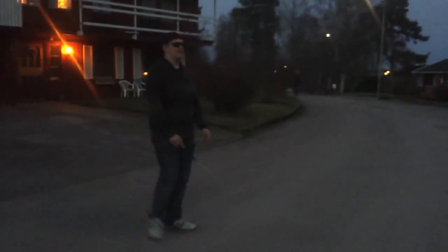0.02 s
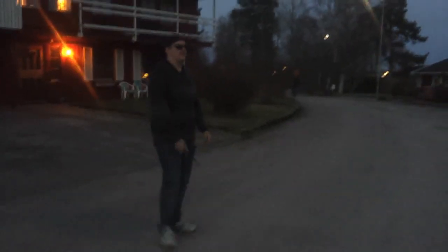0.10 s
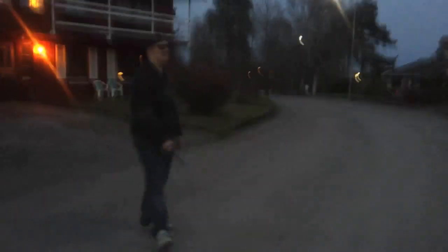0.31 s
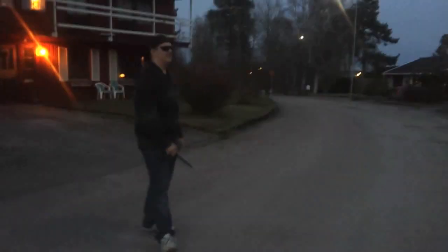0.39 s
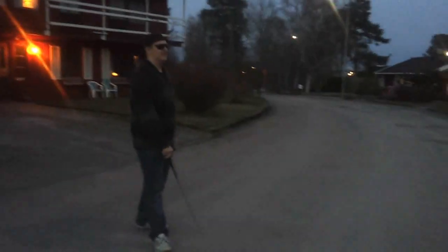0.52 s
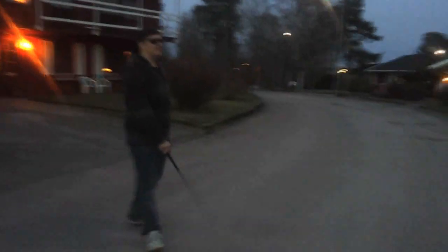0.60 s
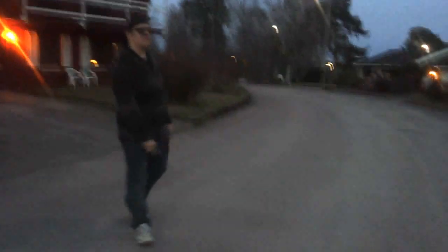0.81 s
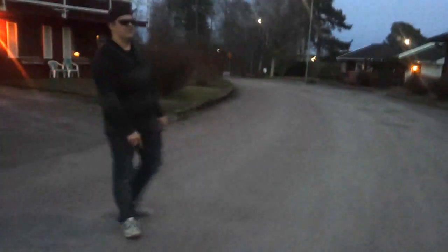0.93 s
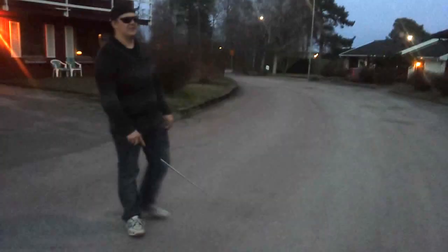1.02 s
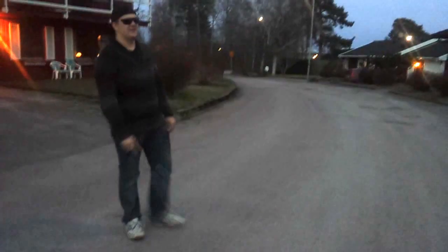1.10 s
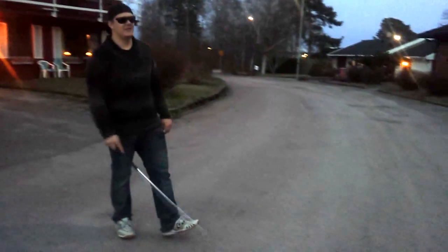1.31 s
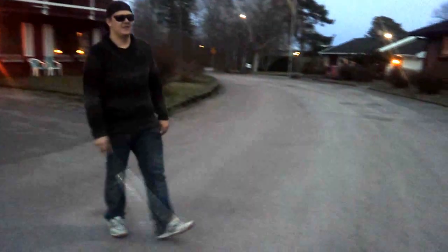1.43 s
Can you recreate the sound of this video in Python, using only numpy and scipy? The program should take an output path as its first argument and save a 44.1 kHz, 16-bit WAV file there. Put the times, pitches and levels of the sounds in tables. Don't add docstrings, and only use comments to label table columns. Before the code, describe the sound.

Four crisp cane taps on rough pavement, each scraping briefly and scattering tiny stones outdoors

```python
import sys
import numpy as np
from scipy import signal
from scipy.fft import rfft, irfft, next_fast_len
from scipy.io import wavfile
from scipy.ndimage import uniform_filter1d, map_coordinates

SR = 44100
rng = np.random.default_rng(int(sys.argv[2]) if len(sys.argv) > 2 else 0)


def how_loud(loudness_db):
    steps = np.asarray(loudness_db, float) / 20
    return 10 ** steps


def file_out(sig):
    cols = np.atleast_2d(sig).T
    lim = np.clip(cols, -1, 1)
    pcm = np.round(lim * 32767).astype(np.int16)
    wavfile.write(sys.argv[1], SR, pcm)


N = 66150

# t/s, length/s, level/dB, t60/s
SKIDS = [
    (.2340, .005, -13.5, .04),
    (.5600, .0035, -17, .032),
    (.8843, .009, -13, .03),
    (1.2109, .0035, -13, .026),
]


def unit(x):
    return x / np.sqrt(np.mean(x ** 2) + 1e-20)


def filtered(x, points):
    m = next_fast_len(x.shape[-1] + 8192)
    f, db = np.transpose(points)
    log_f = np.log(np.fft.rfftfreq(m, 1 / SR) + 1)
    gain = how_loud(np.interp(log_f, np.log(f + 1), db))
    return irfft(rfft(x, m) * gain, m)[..., :x.shape[-1]]


def grains(s, gain, hz, cycles, phase, size):
    t = (np.arange(size) - size // 2) / SR
    life = (cycles / hz)[:, None] * np.where(t > 0, 1.2, .85)
    bell = np.exp(-.5 * (4 * t / life) ** 2)
    wavelets = gain[:, None] * bell * np.sin(2 * np.pi * (hz[:, None] * t + phase[:, None]))
    at = np.round(s * SR).astype(int)[:, None] + np.arange(size) - size // 2
    return np.bincount(np.clip(at, 0, N).ravel(), wavelets.ravel(), N + 1)[:N]


def patchy(colour, patchy_db):
    z = signal.stft(rng.standard_normal(N), nperseg=512)[2]
    field = uniform_filter1d(rng.standard_normal(z.shape), 5, 0)
    field = uniform_filter1d(field, 10, 1)
    noise = signal.istft(z * how_loud(patchy_db * unit(field)), nperseg=512)[1][:N]
    return unit(filtered(noise, colour))


def street():
    # f/Hz, level/dB per Hz
    rumble = [(15, -54), (25, -12.5), (199, -8), (452, -13.5), (605, -12), (730, -17.5), (810, -14),
              (1500, -28), (1950, -59), (3300, -120)]
    # f/Hz, level/dB per Hz
    air = [(710, -67), (1200, -2), (2970, -1.5), (3700, -3), (4600, -1), (6220, -0.5), (11500, -12.5),
           (15000, -43), (22000, -120)]
    air_colour = air[:-2] + [(16000, air[-3][1] - 3)]
    return how_loud(-54) * patchy(rumble, 0.17) + how_loud(-53.5) * patchy(air_colour, 0.92)


def zero_line_kicks():
    # t/s, spike level/dB, step level/dB
    kicks = [
        (-.09, -38, -37.5),
        (0.238, -39, -44),
        (0.563, -37, -41.5),
        (0.885, -38, -38.5),
        (1.207, -37, -44),
    ]
    # f/Hz, level/dB per Hz
    hunt_colour = [(10, 10.5), (25, -26), (60, 0.5), (110, -43)]
    spike_s, hold_s, edge_s, recover_s = .006, .046, .008, .085
    hunt_db, hunt_t60 = -42.5, 0.69
    t, out = np.arange(N) / SR, np.zeros(N)
    hunt = unit(filtered(rng.standard_normal(N), hunt_colour))

    def drift(u):
        return np.clip(u / edge_s, 0, 1) * np.exp(-np.clip(u, 0, None) / recover_s)

    for s, spike_db, step_db in kicks:
        u = np.clip(t - s, 0, None)
        out += how_loud(spike_db) * np.e * u / spike_s * np.exp(-u / spike_s)
        out += how_loud(step_db) * (drift(u) - drift(u - hold_s + edge_s / 2))
        out += how_loud(hunt_db - 60 * u / hunt_t60) * np.clip(u / hold_s, 0, 1) * hunt
    return out


def grit():
    # t/s, level/dB, f/Hz
    sprays = [
        [(0.0, -50.5, 5800), (0.062, -46.5, 5480), (0.08, -67, 5300), (0.132, -51.5, 5800), (0.144, -77, 5100),
         (0.152, -48.5, 4700), (0.162, -69, 4590), (0.2, -70, 4610)],
        [(0.254, -56, 6300), (0.266, -46, 7200), (0.283, -46.5, 7250), (0.292, -47, 7300), (0.314, -43.5, 6240),
         (0.36, -52.5, 5660), (0.408, -48, 5400), (0.428, -65, 5130), (0.5, -59, 5230)],
        [(0.574, -43, 5600), (0.578, -40.5, 6130), (0.606, -46.5, 6360), (0.72, -55.5, 4900), (0.73, -51, 4830),
         (0.776, -85, 5800), (0.8, -54, 5640)],
        [(0.904, -34, 6100), (0.922, -33, 5400), (0.94, -38.5, 5220), (1.07, -46.5, 4600), (1.09, -55.5, 4740),
         (1.134, -48.5, 4770), (1.158, -70.5, 4700), (1.2, -55.5, 4910)],
        [(1.219, -27.5, 5430), (1.236, -39.5, 5800), (1.246, -38, 5450), (1.274, -42, 4750),
         (1.286, -37.5, 4580), (1.338, -48, 4410), (1.458, -51, 4760), (1.5, -67, 4330)],
    ]
    sand_levels = [-16, 2, -1, -11.5, -12]
    # f/Hz, level/dB per Hz
    sand_colour = [(1500, -3.5), (4000, -2), (8000, 1.5), (11500, -10.5), (16000, -13)]
    rate, mean_cycles, size_db = 8000, 12, 2.3
    spread = 0.2905
    when, db, hz = np.transpose([row for spray in sprays for row in spray])
    r = rng.random((12500, 4))
    s = np.cumsum(-np.log(1 - r[:, 0])) / rate
    pitch = np.interp(s, when, hz) * np.exp(spread * rng.standard_normal(len(s)))
    pitch = np.clip(pitch, 2100, 9500)
    gain = how_loud(-size_db * np.log(1 - .97 * r[:, 1]))
    cycles = mean_cycles * (.45 + 2 * r[:, 2] ** 2)
    pebbles = unit(grains(s, gain, pitch, cycles, r[:, 3], size=360))
    sand = unit(filtered(rng.standard_normal(N), sand_colour))
    out, t = np.zeros(N), np.arange(N) / SR
    for rows, sand_db in zip(sprays, sand_levels):
        level = how_loud(np.interp(t, *np.transpose(rows)[:2], left=-99, right=-99))
        sand_gain = how_loud(sand_db) * (level / how_loud(-47.0)) ** 0.36
        out += level * (pebbles + sand_gain * sand)
    return out


def chips():
    # t/s, level/dB, f/Hz
    flecks = [(0.057, -46, 4420), (0.265, -36, 7800), (.2655, -42, 5650), (.266, -43, 2930),
              (0.2687, -39, 8350), (0.2905, -38, 7400), (0.316, -43, 5650), (0.3335, -42, 5040),
              (.4039, -45.5, 5100), (0.57, -24, 5330), (.5895, -36, 7700), (.5906, -40, 6560),
              (.5944, -36, 7270), (.5993, -37, 6750), (.6051, -37, 6400), (0.6144, -40, 6550),
              (.6194, -42, 3470), (.9077, -29, 7540), (.911, -29, 7200), (.9145, -29, 4980),
              (.9206, -42, 3460), (.921, -47, 8900), (.9269, -39, 3560), (.9415, -41, 2820),
              (.955, -37, 5440), (.9628, -35, 5570), (0.9725, -39, 2830), (.9811, -36, 5150),
              (1.0552, -41, 4650), (1.2232, -34, 9800), (1.225, -31.5, 2230), (1.236, -33, 6800),
              (1.247, -37, 8740), (1.2562, -30, 5680), (1.2636, -36, 3900), (1.2823, -34, 5570),
              (1.4373, -41, 5270), (1.4527, -43.5, 4110)]
    # t/s, level/dB, length/s
    cracks = [(0.23, -39, .002), (0.2348, -11.5, 0.00087), (0.2485, -26, .001), (0.255, -31, .002),
              (0.5586, -48, .0028), (0.5597, -22.5, 0.0013), (.5642, -28, 0.0011), (0.879, -35, .003),
              (0.8829, -22, 0.0037), (0.893, -16.5, .0015), (1.208, -44, .003), (1.2112, -17.5, 0.00086),
              (1.2128, -18.5, 0.0014), (1.2196, -35, .001), (1.2203, -36, 0.0017), (1.2468, -49, 0.00135),
              (.2955, -25, 0.00055)]
    # f/Hz, level/dB per Hz
    crack_colour = [(1500, -15.5), (6000, -40), (9500, 1), (13000, -8), (17000, -0.5)]
    fleck_s, crack_t60, rise_s = 0.0025, 0.02, 0.00042
    s, db, hz = np.transpose(flecks)
    r = rng.random((len(s), 2))
    cycles = 2 * hz * fleck_s * (0.49 + 0.82 * r[:, 0])
    out = grains(s, how_loud(db + 4), hz, cycles, r[:, 1], size=512)
    t = np.arange(600) / SR
    for s, db, length in cracks:
        burst = unit(filtered(rng.standard_normal(len(t)), crack_colour))
        decay = how_loud(db - 60 * np.clip(t - length, 0, None) / crack_t60)
        out[round(s * SR):][:len(t)] += decay * np.clip(t / rise_s, 0, 1) * burst
    return out


def skids():
    # f/Hz, level/dB per Hz
    tip = [
        [(120, -50), (200, -12.5), (750, -13.5), (1530, -22), (2040, 3.5), (2420, -11.5), (4230, 0), (5360, -3),
         (11500, -18), (15000, -55), (22000, -120)],
        [(120, -25), (200, -37), (984, -15), (1660, -20.5), (2680, -11.5), (4680, -12), (5450, -12.5),
         (7920, -10), (11500, -53), (15000, -58), (22000, -120)],
        [(120, -55), (200, -33), (859, -3.5), (1870, -5.5), (3060, 4), (3760, 2.5), (5840, 4.5), (10000, -6),
         (11500, -27), (15000, -33), (22000, -120)],
        [(120, -48), (200, -17), (444, -21), (1340, -4), (1690, -35), (2010, -0.5), (3390, -2.5), (4530, 3.5),
         (11500, -20), (15000, -36), (22000, -120)],
    ]
    treble_t60 = [0.047, .02, 0.089, .015]
    out, t = np.zeros(N), np.arange(SR // 10) / SR - .002
    for (s, length, db, t60), colour, top_t60 in zip(SKIDS, tip, treble_t60):
        lump_db = map_coordinates(rng.standard_normal(300), [np.arange(len(t)) * 1300 / SR])
        colour = colour[:-2] + [(16000, colour[-3][1] - 4)]
        crush = unit(how_loud(2.2 * lump_db) * filtered(rng.standard_normal(len(t)), colour))
        top = filtered(crush, [(7000, -40), (8500, 0)])
        crush = crush - 0.7 * top * (1 - how_loud(-60 * np.clip(t, 0, None) / top_t60))
        shape = how_loud(-60 * np.clip(t - length, 0, None) / t60) * np.clip(t / .0005, 0, 1)
        out[round((s + t[0]) * SR):][:len(t)] += how_loud(db) * shape * crush
    return out


def shaft():
    # f/Hz, level/dB
    shaft_modes = [
        [(340, -44), (610, -50), (764, -33), (1140, -26.5), (1300, -31), (1870, -22.5), (2150, -31)],
        [(345, -33), (624, -40.5), (834, -39), (1380, -23), (1710, -22.5), (2030, -18), (2270, -22.5)],
        [(340, -25.5), (672, -33.5), (870, -22), (1170, -28), (1340, -23.5), (1600, -25), (2310, -20.5)],
        [(740, -38.5), (390, -52), (925, -32.5), (1250, -32), (1344, -16.5), (1980, -9.5), (2244, -10)],
    ]
    mode_t60 = [0.03, 0.13, 0.061, 0.034, 0.037, 0.037, 0.034]
    out, t = np.zeros(N), np.arange(SR // 5) / SR
    for (s, length, *_), modes, phases in zip(SKIDS, shaft_modes, rng.standard_normal((4, 7))):
        ring = np.zeros(len(t))
        for (hz, db), t60, phase in zip(modes, mode_t60, phases):
            ring += how_loud(db - 60 * t / t60) * np.sin(2 * np.pi * hz * t + phase)
        out[round((s + length / 4) * SR):][:len(t)] += ring * (1 - np.exp(-t / 0.00094))
    return out


def stones():
    # t/s, peak level/dB, f/Hz, cycles
    struck = [(.2363, -1, 3700, 3.5), (.2377, -1, 4100, 5), (.2399, -2, 4100, 4), (.2413, -2, 4430, 3),
              (.2430, -12, 3900, 6), (.2449, -10, 4140, 3.5), (.2466, -11, 4740, 2), (.2477, -2, 4000, 5),
              (.2493, -10, 3880, 3), (.5607, -3, 4150, 8), (.5623, -6, 4700, 6), (.5644, -14, 2900, 2),
              (.5669, -9, 4500, 12), (.5762, -26, 3500, 3), (.8852, -6, 5820, 10), (.8976, -6, 5900, 6),
              (.8997, -17, 5280, 6), (.9196, -13, 6280, 5), (.9299, -19, 5970, 5), (1.2147, -6, 2300, 2.5),
              (1.2178, -8, 3000, 1.8), (.6440, -50, 2550, 60), (1.2470, -16, 6160, 5),
              (1.2482, -17, 6100, 6), (1.2895, -20, 4600, 11), (1.2475, -25, 3500, 4),
              (1.2897, -30, 2900, 4), (.6620, -44, 2830, 60)]
    # t/s, peak level/dB
    ticks = [(.2958, -27), (.8532, -29), (.8586, -35), (.8625, -30), (.8641, -31), (.8719, -32),
             (.955, -26), (1.055, -31), (1.263, -31), (1.282, -29), (.590, -29), (.5945, -29), (.619, -33),
             (.404, -34)]
    tick_hz, tick_t60 = 5800, 0.0015
    s, db, hz, cycles = np.transpose(struck)
    out = grains(s, how_loud(db), hz, cycles, rng.random(len(s)), size=2048)
    r = rng.random((len(s), 2))
    edge_gain = how_loud(1.55 * db - 3.0) * (cycles < 20)
    edge_hz = hz * (1.58 + 0.32 * r[:, 0])
    out += grains(s + r[:, 0] / hz, edge_gain, edge_hz, 4 + 0 * s, r[:, 1], size=128)
    t = np.arange(200) / SR
    for (s, db), r in zip(ticks, rng.random((len(ticks), 1))):
        tone = np.sin(2 * np.pi * tick_hz * (.9 + .2 * r) * t)
        out[round(s * SR):][:len(t)] += how_loud(db + 3 - 60 * t / tick_t60) * tone
    return out


def scene():
    return (skids() + shaft() + stones() + grit() + street() + chips())[None]


def band_limit(x):
    return signal.sosfilt(signal.butter(12, 15900, fs=SR, output="sos"), x)


def record(dry):
    # f/Hz, level/dB
    mic = [(11800, 0), (12100, -17), (15650, -19), (15850, -36), (16700, -40), (17000, -70)]
    limited = dry / (1 + np.abs(dry / .93) ** 5) ** (1 / 5)
    return band_limit(filtered(limited, mic) + zero_line_kicks())


dry = scene()
out = record(dry)
file_out(out)
```